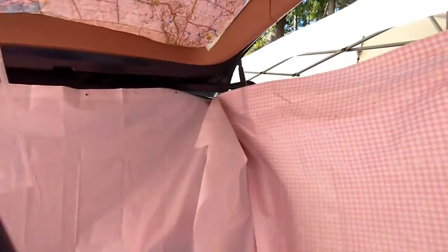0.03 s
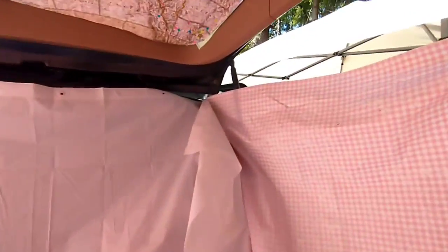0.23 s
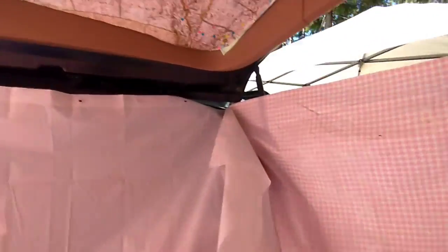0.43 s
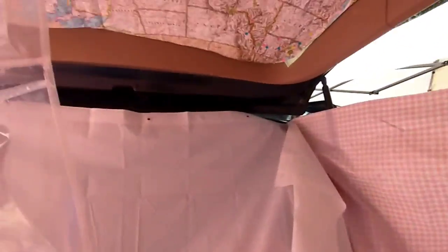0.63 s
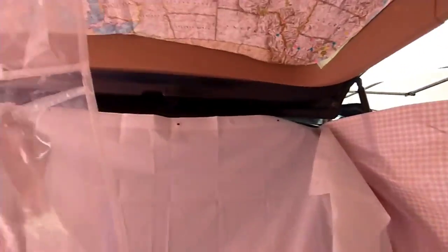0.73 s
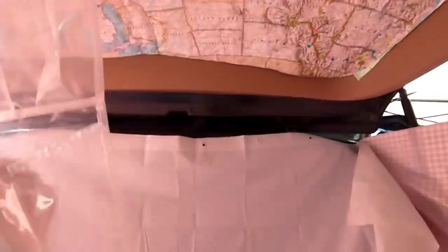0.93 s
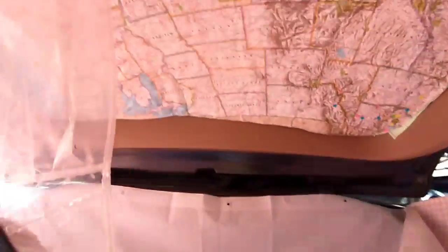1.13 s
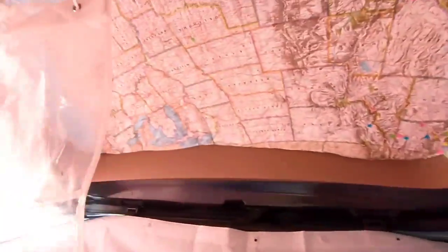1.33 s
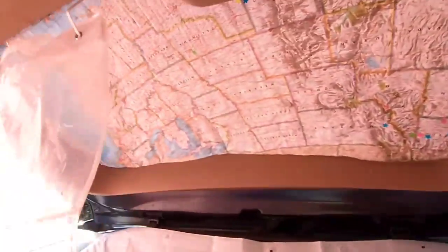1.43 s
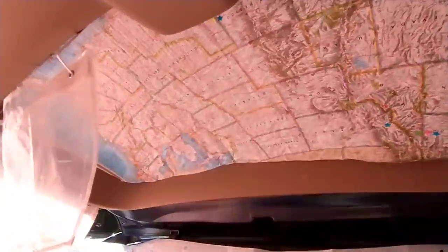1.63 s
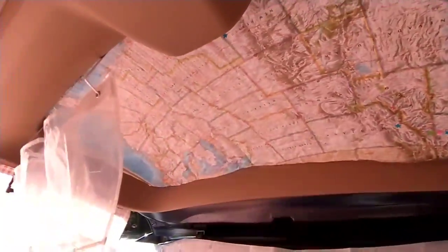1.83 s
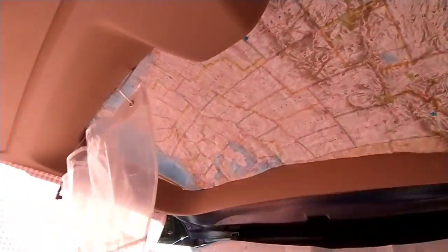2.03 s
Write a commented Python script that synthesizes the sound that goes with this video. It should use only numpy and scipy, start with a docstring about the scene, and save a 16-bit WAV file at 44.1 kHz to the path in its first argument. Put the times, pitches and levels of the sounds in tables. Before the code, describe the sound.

Plastic sheeting rustles against a hand-held microphone. From about 0.2 to 0.6 seconds a rasping swish swells close on the right, with soft low handling bumps, ending in a cluster of crinkly snaps around 0.7. Quieter rubbing of plastic and cloth follows, with a scuff at 1 second and a second, lighter swish around 1.3 to 1.5. Scattered crinkles thin out by 2 seconds over a faint steady hiss.

```python
"""A rasping, crinkling swish: plastic sheeting and cloth curtains are pushed past a hand-held camera
at the open back of a van. One fold sweeps close by the right microphone; a second slides by further
off and scuffs the casing. The rubbing is stick-slip friction, thousands of tiny slips a second.
Buckling folds snap and flap, the hand bumps the camera, and a soft hiss lies under it all."""
import sys
import numpy as np
from scipy import signal
from scipy.fft import rfft, irfft
from scipy.io import wavfile
from scipy.ndimage import uniform_filter1d, map_coordinates

SR = 44100
rng = np.random.default_rng(int(sys.argv[2]) if len(sys.argv) > 2 else 0)


def wav_out(sig):
    """Save sig, one row per channel (or a flat mono array), as 16-bit PCM at SR to the path in sys.argv[1]."""
    wavfile.write(sys.argv[1], SR, np.round(np.clip(np.atleast_2d(sig).T, -1, 1) * 32767).astype(np.int16))


N = 92610

# The further sheet. Each row: time in seconds, body and treble levels in dB, left minus right in dB.
SLIDE_LEVELS = [(0, -63, -62, -1), (.11, -63.5, -57, 1), (.16, -69, -69, -7), (.27, -67, -56, 0),
                (.56, -65, -66, 8), (.68, -57.5, -60, 4), (.73, -62, -64.5, -1), (.87, -61, -61, -0.5),
                (.95, -65, -74, 0), (1.0, -56, -65, 2), (1.1, -62, -63.5, -2), (1.21, -54.5, -49.5, -1),
                (1.29, -53.5, -45.5, -2), (1.345, -58.5, -41.5, 1), (1.385, -59, -46.5, -1),
                (1.45, -61, -46.5, 1.5), (1.49, -57, -53.5, 0), (1.62, -56.5, -56.5, 0.5),
                (1.71, -58, -56, 1), (1.825, -55.5, -53.5, 1), (1.87, -60, -63, -1.5),
                (1.96, -61.5, -62.5, 3), (2.1, -66, -71, 0.5)]


def close_sweep():
    """Path difference: a fold rubs past on the right and reaches the left ear later and duller."""
    # Each row: time in seconds, then rasp, sizzle and fizz levels in dB before each band's gain.
    levels = [(.14, -64.5, -85, -81), (.17, -60, -70, -67), (.215, -57, -65.5, -68),
              (.285, -51.5, -55.5, -51.5), (.335, -53, -50, -48), (.4, -45, -45.5, -46),
              (.45, -50, -46, -44), (.51, -54.5, -46.5, -42.5), (.565, -49.5, -44, -49.5),
              (.61, -49, -52.5, -53), (.645, -62, -74, -68)]
    # Each row, one per band: gain in dB, left minus right in dB.
    balance = [(3, -.5), (2, -7), (2, -10)]
    # The three bands. Each row: frequency in Hz, relative level in dB.
    rasp = [(300, -14), (1100, -13.5), (1500, -10.5), (2100, -1), (3000, 2.5), (4000, -0.5), (5200, -4),
            (7000, -7.5), (16000, -39)]
    sizzle = [(1000, -52), (3500, -47), (4800, -9.5), (5900, -7.5), (6800, -1), (8000, -3), (9300, -3.5),
              (11000, -12), (16000, -44)]
    fizz = [(1000, -63), (4000, -35), (8000, -28), (10500, -5), (13000, -1.5), (14500, -2.5), (16000, -6.5)]
    # Each row: time in seconds, delay at the left microphone in milliseconds.
    left_lag = [(.15, .51), (.33, .497), (.45, .475), (.57, .37), (.62, .36)]
    # Each row: frequency in Hz, coherence of the left signal with the delayed right one.
    coherence = [(300, .8), (1000, .95), (1500, .8), (2100, .93), (2700, .995), (3300, .995), (3800, .6),
                 (5000, .55), (7000, .35), (16000, .2)]
    n, out = np.arange(N), np.zeros((2, N))
    late = n - curve(left_lag) * SR / 1000
    alike = read(coherence, N)
    for column, (band, (gain_db, side_db)) in enumerate(zip((rasp, sizzle, fizz), balance), 1):
        scattered, right = friction()
        delayed = map_coordinates(right, [late], mode="nearest")
        left = irfft(alike * rfft(delayed) + np.sqrt(1 - alike ** 2) * rfft(scattered), N)
        rub = colour(np.array([left, right]), band)
        out += rub * amp(curve(levels, column) + gain_db) * pan(side_db)
    outside_s = np.maximum(np.maximum(levels[0][0] - n / SR, n / SR - levels[-1][0]), 0)
    return (out + gap_hiss()) * np.exp(-outside_s / .012)  # fades in before the sweep and out after


def gap_hiss():
    """Cavity resonance: the narrow gap between fold and casing gives the hiss a gliding pitch."""
    # Each row: time in seconds, resonance in Hz, level in dB before the high-pass.
    gap = [(.2, 6360, -68), (.29, 6100, -48.5), (.34, 6160, -54), (.415, 6950, -46.5), (.47, 7550, -52),
           (.53, 8900, -47), (.57, 6850, -42), (.615, 6260, -58), (.645, 6360, -91)]
    hiss = resonate(friction(), curve(gap), width_hz=2100) * amp(curve(gap, 2)) * pan(-10)
    return signal.sosfilt(signal.butter(4, 4800, "high", fs=SR, output="sos"), hiss)


def slide():
    """Sliding friction: the rest of the sheet rubs on cloth, its body and treble swelling separately."""
    # Each row: frequency in Hz, relative level in dB.
    body_spectrum = [(100, -19), (500, -12), (1000, -8.5), (1600, -3.5), (2300, 3), (4000, 2.5), (5500, 1),
                     (8000, -8.5), (16000, -31)]
    treble_spectrum = [(500, -66), (3000, -9.5), (5200, -4), (6800, 1), (8500, 1), (10000, -1), (13000, -3),
                       (16000, -2)]
    body = colour(friction(), body_spectrum) * amp(curve(SLIDE_LEVELS))
    treble = colour(friction(), treble_spectrum) * amp(curve(SLIDE_LEVELS, 2))
    return (body + treble) * pan(curve(SLIDE_LEVELS, 3))


def friction(slips_per_s=6000, spread_db=2, slip_share=.61, flutter_db=1.02):
    """Stick-slip friction: tiny impulses over a smooth hiss, fluttering with the pressure."""
    slips = (rng.random((2, N)) < slips_per_s / SR) * rng.choice([-1, 1], (2, N))
    slips = slips * amp(spread_db * np.minimum(rng.exponential(1, (2, N)), 4))
    flutter = unit(uniform_filter1d(uniform_filter1d(rng.standard_normal(N), size=300), size=200))
    rub = np.sqrt(slip_share) * unit(slips) + np.sqrt(1 - slip_share) * diffuse(N)
    return rub * amp(flutter_db * flutter)


def patchy_colour(x, depth_db=1.8, patch_hz=300, patch_s=.07):
    """Uneven colouring: random, drifting spectral peaks and dips, like reflections inside the van."""
    frame, hop = 512, 128
    spectra = signal.stft(x, nperseg=frame, noverlap=frame - hop)[2]
    patches = rng.standard_normal(spectra.shape[:0:-1])  # time by frequency
    patches = uniform_filter1d(patches, size=round(patch_s * SR / hop), axis=0)
    patches = unit(uniform_filter1d(patches, size=round(patch_hz * frame / SR), axis=1))
    return signal.istft(spectra * amp(depth_db * patches.T), nperseg=frame, noverlap=frame - hop)[1][:, :N]


def crinkles(ticks_per_s=44):
    """Buckling: large folds snap and flap; small creases tick at random, following the slide's level."""
    # Each row: start in seconds, snap in dB, snap pitch in Hz, flap in dB, left minus right in dB.
    buckles = [(.05, -59, 2270, -66, -10), (0.089, -58, 3000, -61, 2), (0.164, -46.5, 2150, -58, -2),
               (0.36, -47, 2770, -61, 3), (0.4, -42, 2780, -60, 3), (0.582, -44, 2520, -59, 3),
               (0.609, -43, 2330, -49, -1), (.625, -52.5, 2000, -55.5, 16), (.654, -45.5, 4670, -70, -3),
               (.655, -39, 2660, -56, -9), (0.669, -46.5, 2250, -57, -3), (.684, -43.5, 2220, -57, -13),
               (0.821, -48, 1820, -69, -4), (.898, -52, 2660, -56, -7), (.909, -49.5, 2150, -66, -9),
               (.916, -50, 2450, -69, 9), (0.976, -50.5, 1860, -54, -4), (0.985, -46, 4020, -52.5, 0.5),
               (1.035, -45.5, 2320, -59, -0.5), (1.074, -57, 2100, -59, 1), (1.112, -53, 3330, -62.5, 2),
               (1.283, -42, 2930, -64, -1.5), (1.515, -50, 2600, -61, 3), (1.59, -52.5, 1550, -60, 4),
               (1.612, -54, 2430, -64, 4), (1.636, -53.5, 2230, -77, 4), (1.661, -54, 1800, -65, 1),
               (1.868, -42.5, 3260, -74, 2), (1.951, -57.5, 3000, -64, 3), (2.048, -54, 2860, -74, 1)]
    out, body_db = np.zeros((2, N)), curve(SLIDE_LEVELS)
    for start, snap_db, hz, flap_db, side_db in buckles:
        add(out, start, (amp(snap_db) * snap(hz) + amp(flap_db) * flap()) * pan(side_db))
    for when, strength, octaves, side in rng.uniform(-1, 1, (round(ticks_per_s * N / SR), 4)):
        at = int((when + 1) / 2 * N)
        tick_db = body_db[at] - 6 + 3 * strength
        add(out, at / SR, amp(tick_db) * snap(2500 * 2 ** octaves) * pan(4 * side))
    return out


def snap(hz, size=4096):
    """Snap-through: a crease pops with a broad crack around one pitch, and the sheet shivers briefly."""
    rise_s, fade_s, shiver_s, width_octaves = .00031, .0038, .037, .55
    t, f = np.arange(size) / SR, np.fft.rfftfreq(size, 1 / SR) + 1
    rolloff = (1 + (np.log2(f / hz) / width_octaves) ** 2) ** 1.25
    crack = unit(irfft(rfft(diffuse(size)) / rolloff))
    after = np.maximum(t - rise_s, 0)
    decay = np.exp(-after / fade_s) + amp(-19.5) * np.exp(-after / shiver_s)
    return crack * np.minimum(t / rise_s, 1) * decay


def flap(size=4096, rise_s=.0014, fade_s=.015):
    """Air displacement: a buckling fold pushes out a dull puff."""
    # Each row: frequency in Hz, relative level in dB.
    spectrum = [(40, -12), (120, -8), (250, -7), (500, 1.5), (800, -6), (1300, -8), (3000, -9),
                (16000, -77)]
    t = np.arange(size) / SR
    return colour(diffuse(size), spectrum) * np.minimum(t / rise_s, 1) * np.exp(-t / fade_s)


def scuffs(rise_s=.0042, fade_s=.012):
    """Forced resonance: short rubs on the casing hiss and make the microphone ports ring."""
    # Each row: start and hold in seconds, hiss and ring levels in dB, left minus right in dB.
    rubs = [(0.748, .008, -55, -78, 2), (1.005, 0.01, -49, -47.5, 0.5), (1.027, .005, -55, -55, 5),
            (1.31, 0.02, -45.5, -46.5, 4), (1.39, 0.032, -52.5, -51.5, 4)]
    # Each row: frequency in Hz, relative level in dB.
    hiss_spectrum = [(500, -18), (3000, -8), (6000, 3.5), (8000, 4), (11000, 5.5), (12500, -5), (16000, -2)]
    t, out = np.arange(0, .15, 1 / SR), np.zeros((2, N))
    for start, hold_s, hiss_db, ring_db, side_db in rubs:
        hiss = amp(hiss_db) * colour(rng.standard_normal((2, len(t))), hiss_spectrum)
        ring = amp(ring_db) * resonate(rng.standard_normal((2, len(t))), hz=8190, width_hz=600)
        envelope = np.minimum(t / rise_s, 1) * np.exp(-np.maximum(t - hold_s, 0) / fade_s)
        add(out, start, envelope * pan(side_db) * (hiss + ring))
    return out


def handling(half_width_cycles=.7, right_db=-41):
    """Structure-borne sound: the hand's bumps reach mostly the left microphone, over the grip's rumble."""
    # Each row: time of the peak in seconds, left peak level in dB, frequency in Hz.
    bumps = [(0.164, -58.5, 111), (.413, -44.5, 98), (0.43, -45, 92.5), (0.47, -39.5, 87.5), (.5, -42, 113),
             (0.566, -47.5, 70), (0.585, -49, 370), (0.593, -50, 65), (.612, -54.5, 430), (0.627, -49, 560),
             (1.051, -51, 142), (1.078, -60, 110)]
    # Each row: time in seconds, level in dB.
    rumble_levels = [(0, -73), (.33, -79.5), (.39, -70), (.55, -64), (.63, -59), (.68, -63.5), (.74, -74.5),
                     (.92, -71.5), (1.04, -66), (1.13, -69.5), (1.27, -74), (1.42, -77.5), (1.85, -75),
                     (2.1, -81)]
    # Each row: frequency in Hz, relative level in dB.
    rumble_spectrum = [(20, -46), (50, -9), (85, -3.5), (120, -0.5), (190, -11.5), (400, -21.5),
                       (2000, -76)]
    out = colour(diffuse(N), rumble_spectrum) * amp(curve(rumble_levels))
    for peak_s, db, hz in bumps:
        cycles = (np.arange(N) / SR - peak_s) * hz
        pulse = np.cos(2 * np.pi * cycles) * np.exp(-(cycles / half_width_cycles) ** 2)
        out += amp([[db], [db + right_db]]) * pulse
    return out


def cloth():
    """Friction of soft fabric: the dragged curtain gives a dull rub."""
    # Each row: time in seconds, level in dB.
    levels = [(0, -78), (.15, -69), (.33, -86), (.52, -65.5), (.565, -85), (.62, -60.5), (.685, -66),
              (.73, -72.5), (.86, -66.5), (.905, -65), (.95, -70.5), (.99, -65), (1.12, -69.5), (1.27, -68),
              (1.4, -71.5), (1.5, -79), (1.61, -65.5), (1.665, -68), (1.695, -70), (1.76, -68),
              (1.825, -66.5), (1.855, -90), (1.94, -74), (2.0, -77), (2.1, -73)]
    # Each row: frequency in Hz, relative level in dB.
    spectrum = [(80, -26), (200, 0), (420, -5), (750, 0.5), (1100, -4), (1600, -10), (3000, -25),
                (16000, -66)]
    return colour(friction(), spectrum) * amp(curve(levels))


def air():
    """Ambient noise: a soft, steady hiss from all around."""
    # Each row: frequency in Hz, relative level in dB.
    spectrum = [(40, -5), (100, -6), (250, -2), (600, 1), (1200, -8.5), (2200, -9.5), (4000, -24),
                (9000, -5), (15500, -9)]
    return colour(diffuse(N), spectrum) * amp(-65.5)


def diffuse(size):
    """A diffuse field: noise that is alike at both microphones only in the bass."""
    # Each row: frequency in Hz, correlation of left and right.
    correlation = [(50, 0.82), (400, 0.71), (900, 0.19), (1500, -0.16), (3000, -0.11), (16000, -0.15)]
    left, independent = rfft(rng.standard_normal((2, size)))
    alike = read(correlation, size)
    right = alike * left + np.sqrt(1 - alike ** 2) * independent
    return irfft(np.array([left, right]), size)


def resonate(x, hz, width_hz):
    """A double-pole resonance that can follow a pitch curve, scaled to rms 1."""
    carrier = np.exp(2j * np.pi * np.cumsum(hz * np.ones(x.shape[-1])) / SR)
    pole = np.exp(-np.pi * width_hz / SR)
    return unit((carrier * signal.lfilter([1], [1, -2 * pole, pole * pole], x / carrier)).real)


def colour(x, spectrum):
    """Spectral shaping, scaled to rms 1."""
    size = x.shape[-1]
    return unit(irfft(rfft(x) * amp(read(spectrum, size)), size))


def read(points, size):
    """Interpolation of a table in log frequency, onto the bins of a sound of this size."""
    f, value = np.transpose(points)
    return np.interp(np.log(np.fft.rfftfreq(size, 1 / SR) + 1), np.log(f + 1), value)


def curve(rows, column=1):
    """Linear interpolation of one column in time."""
    rows = np.array(rows)
    return np.interp(np.arange(N) / SR, rows[:, 0], rows[:, column])


def pan(db):
    """Constant-power gains for a level difference, left minus right."""
    gains = amp(np.array([db, -db]).reshape(2, -1) / 2)
    return gains / np.sqrt(np.mean(gains ** 2, axis=0))


def add(mix, start_s, sound):
    """Superposition of a sound onto the mix."""
    part = mix[:, max(round(start_s * SR), 0):][:, :sound.shape[1]]
    part += sound[:, :part.shape[1]]


def amp(db):
    """Decibels to gain."""
    return 10 ** (np.asarray(db) / 20)


def unit(x):
    """Normalisation to rms 1."""
    return x / np.sqrt(np.mean(x ** 2) + 1e-20)


def scene():
    """Superposition: sheet, curtain and handling add to the steady hiss of the air."""
    return air() + patchy_colour(close_sweep() + slide() + cloth()) + scuffs() + handling() + crinkles()


def record(dry, cutoff_hz=15720):
    """Band limiting: a steep low-pass removes the highest treble."""
    lowpass = signal.firwin(1023, cutoff_hz, window=("kaiser", 9), fs=SR)
    return signal.oaconvolve(dry, lowpass[None], "same")


dry = scene()
out = record(dry)
wav_out(out)
```